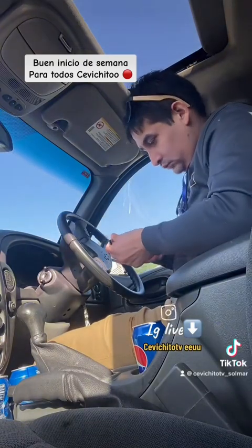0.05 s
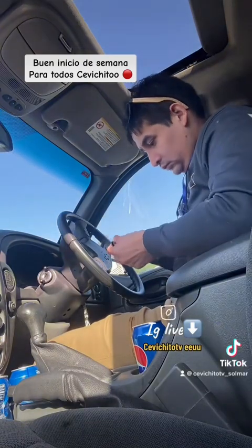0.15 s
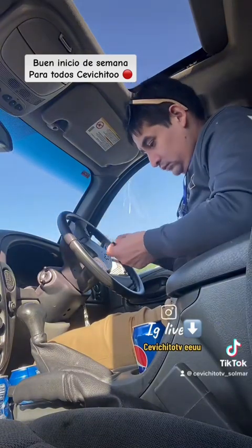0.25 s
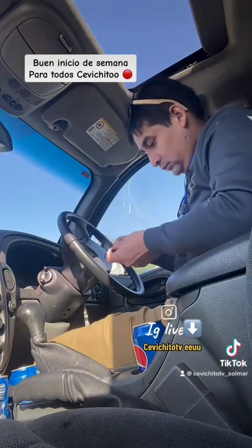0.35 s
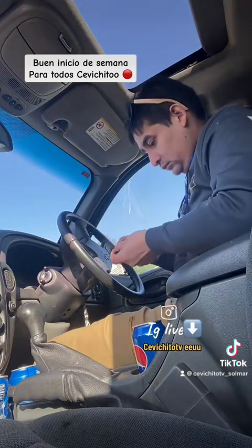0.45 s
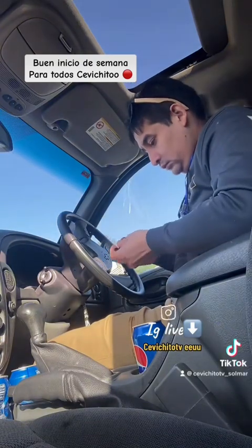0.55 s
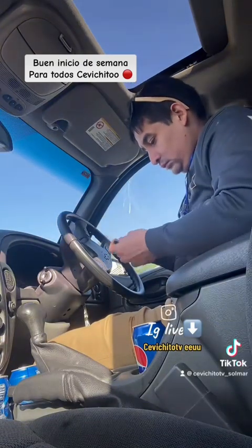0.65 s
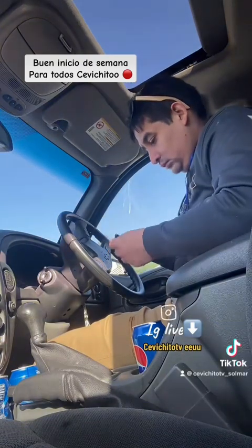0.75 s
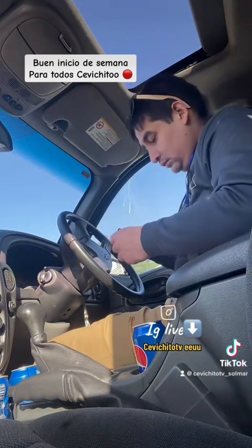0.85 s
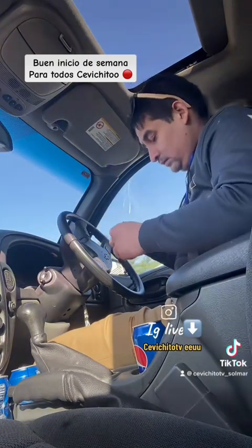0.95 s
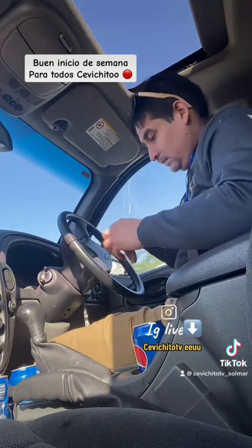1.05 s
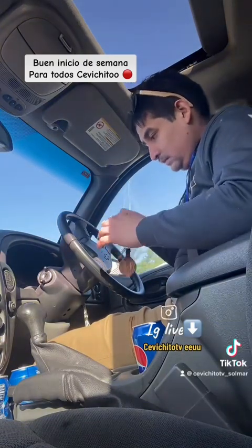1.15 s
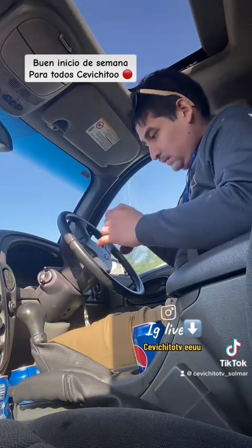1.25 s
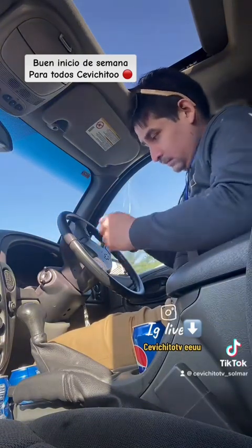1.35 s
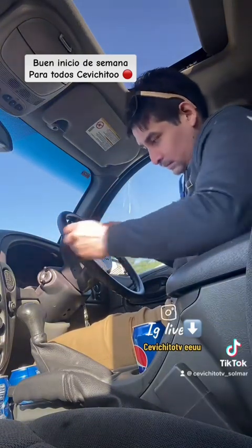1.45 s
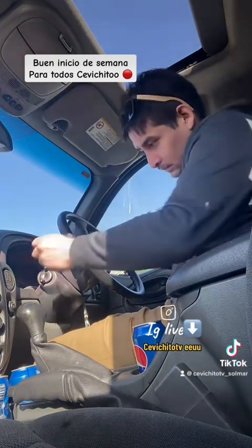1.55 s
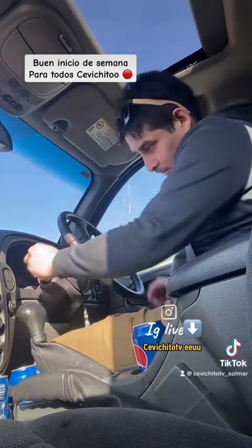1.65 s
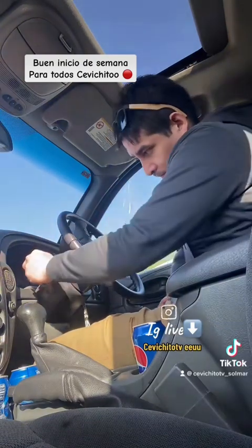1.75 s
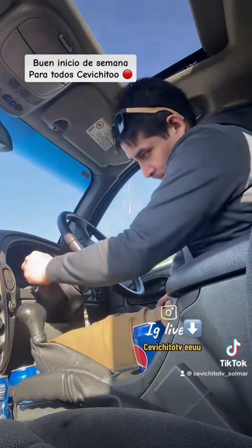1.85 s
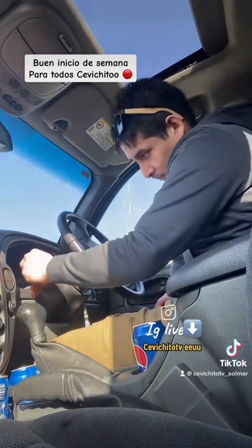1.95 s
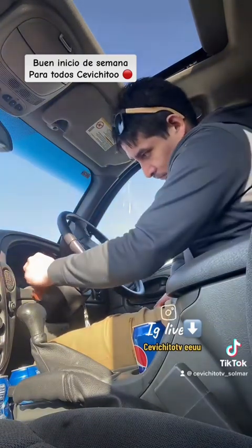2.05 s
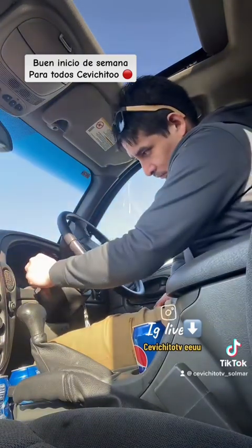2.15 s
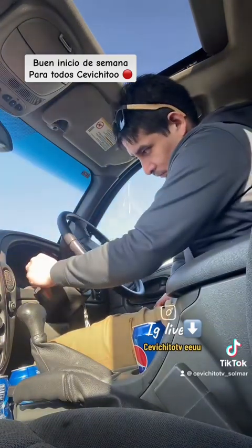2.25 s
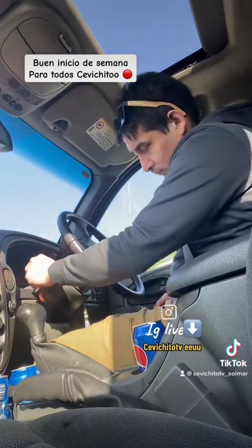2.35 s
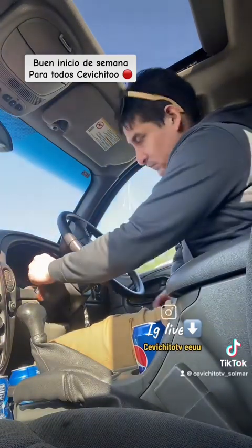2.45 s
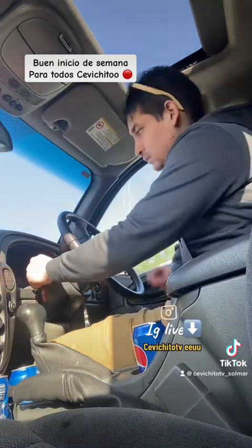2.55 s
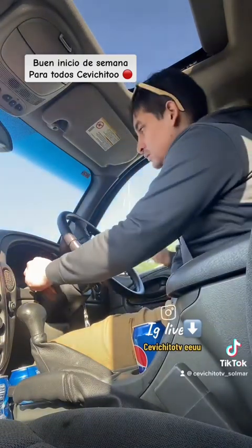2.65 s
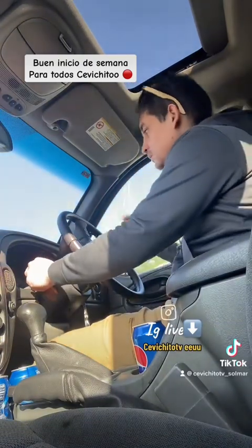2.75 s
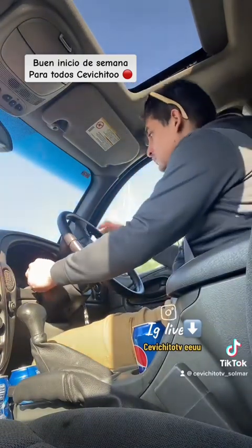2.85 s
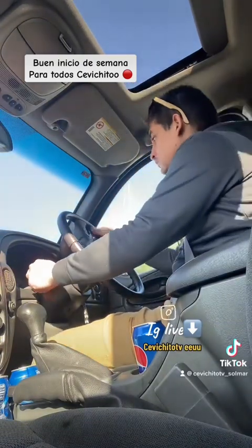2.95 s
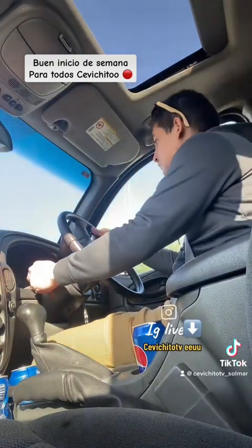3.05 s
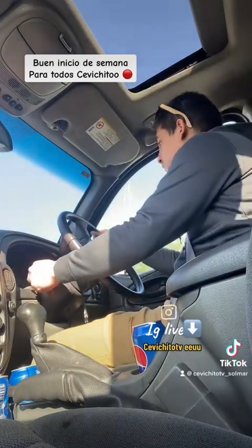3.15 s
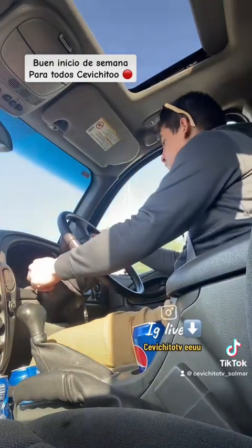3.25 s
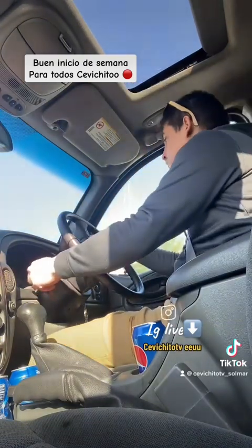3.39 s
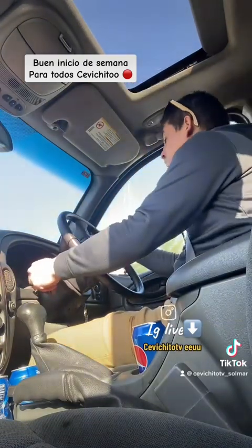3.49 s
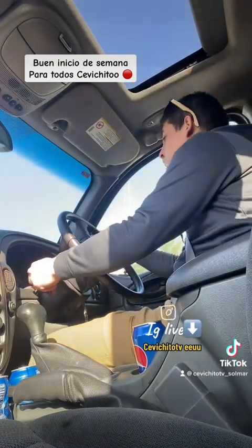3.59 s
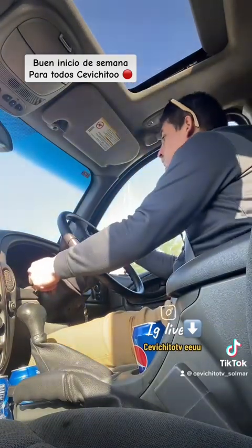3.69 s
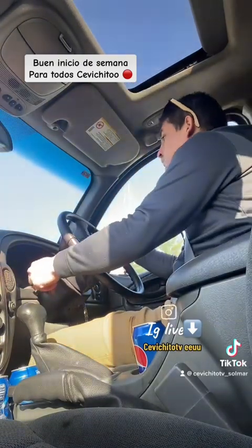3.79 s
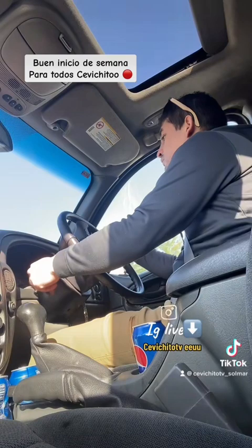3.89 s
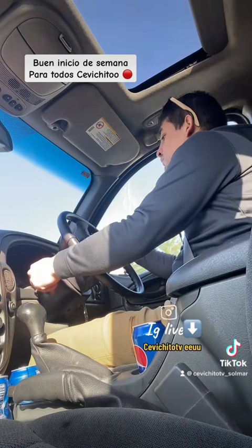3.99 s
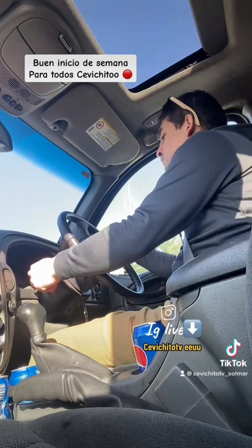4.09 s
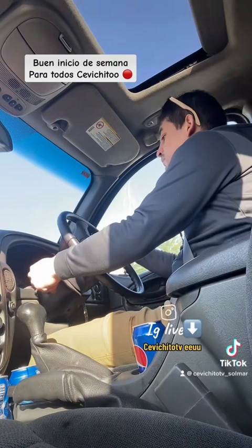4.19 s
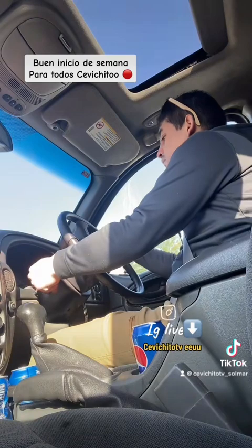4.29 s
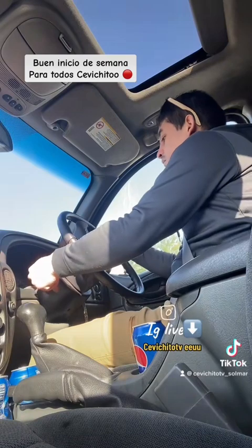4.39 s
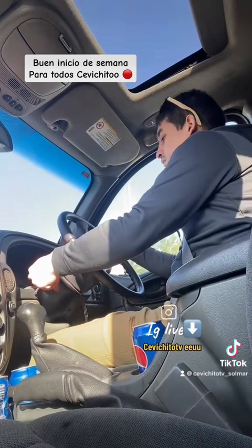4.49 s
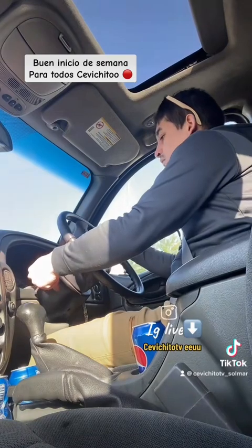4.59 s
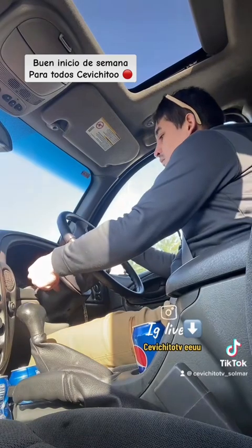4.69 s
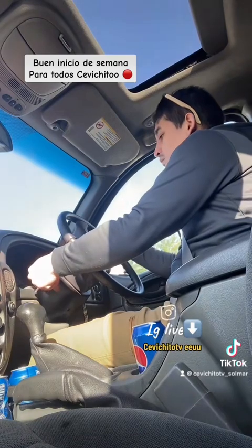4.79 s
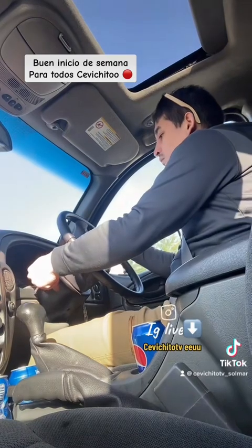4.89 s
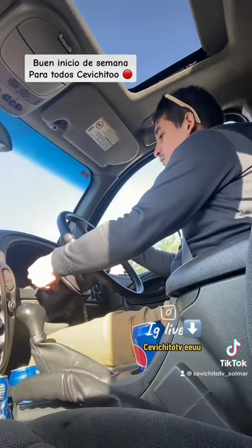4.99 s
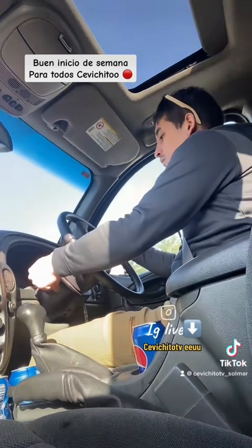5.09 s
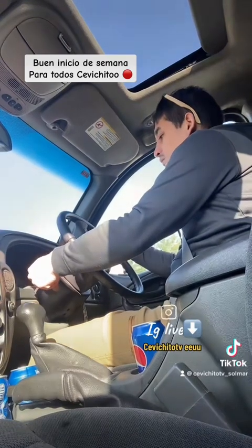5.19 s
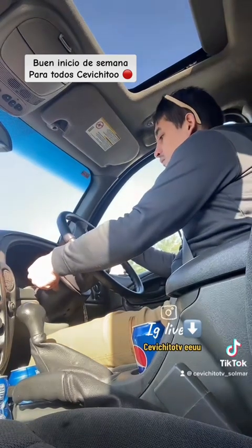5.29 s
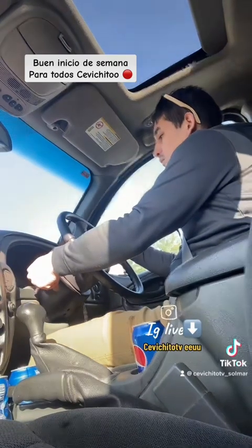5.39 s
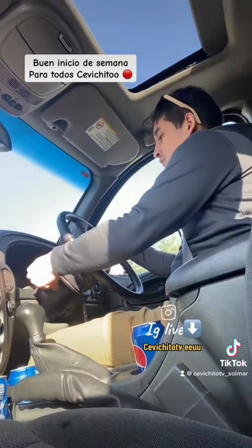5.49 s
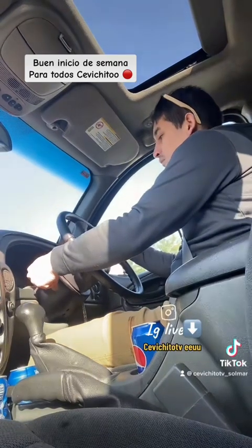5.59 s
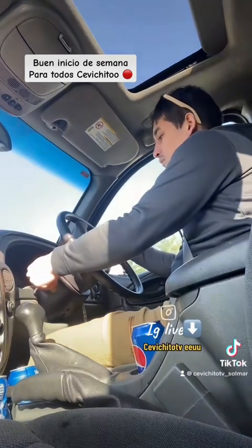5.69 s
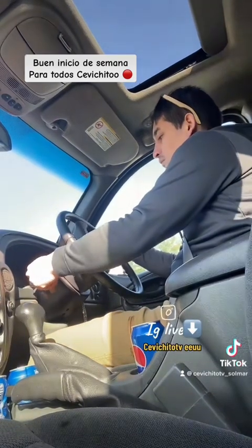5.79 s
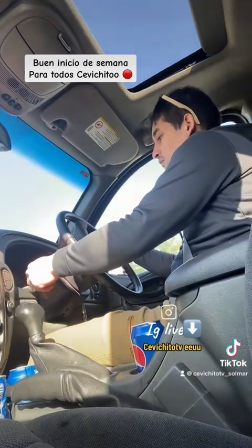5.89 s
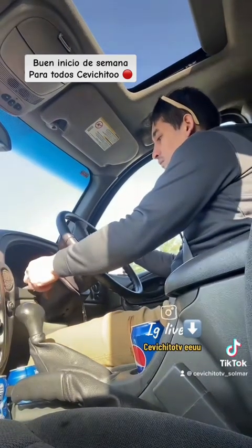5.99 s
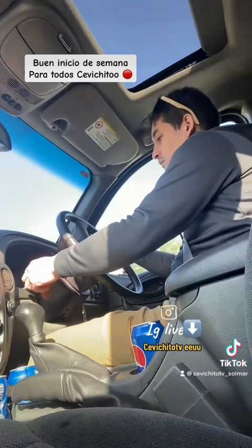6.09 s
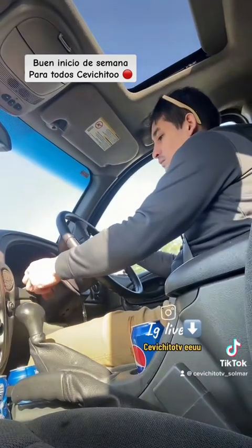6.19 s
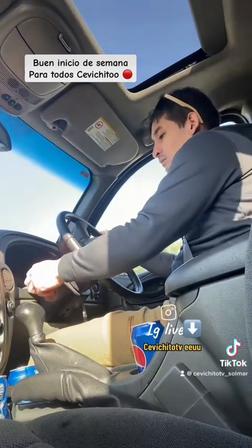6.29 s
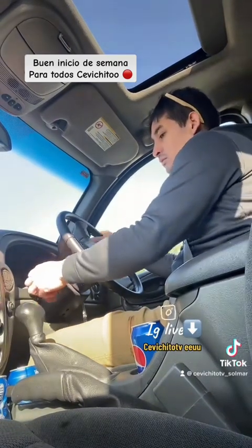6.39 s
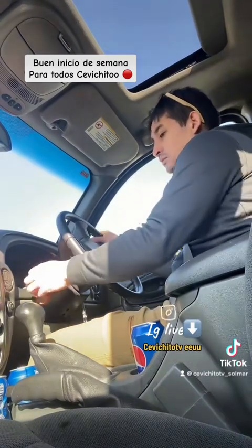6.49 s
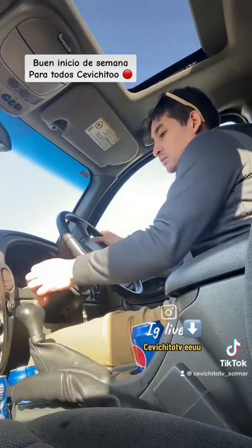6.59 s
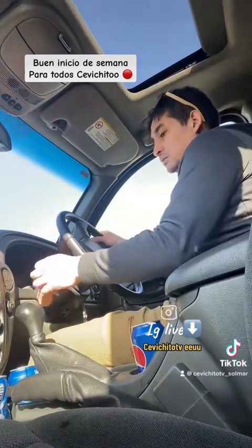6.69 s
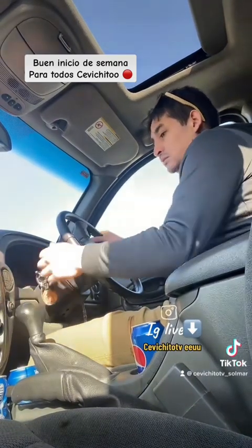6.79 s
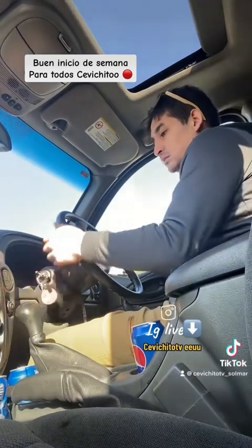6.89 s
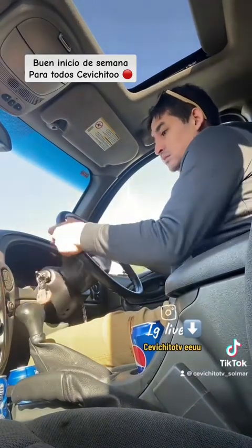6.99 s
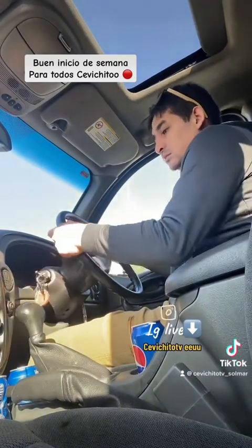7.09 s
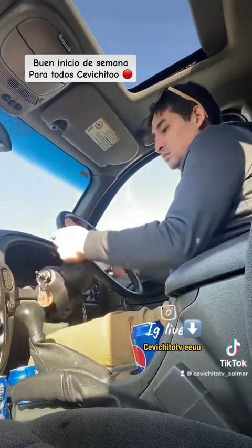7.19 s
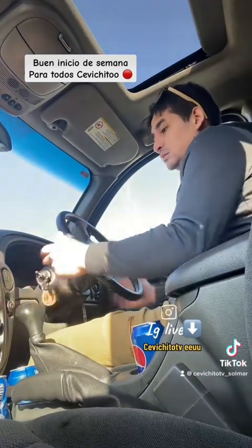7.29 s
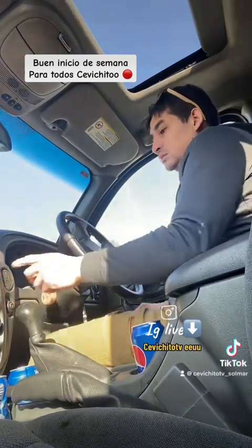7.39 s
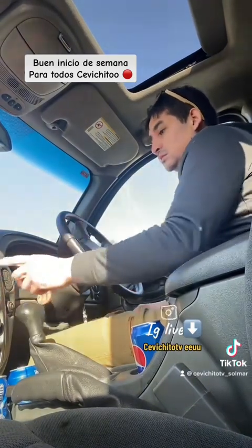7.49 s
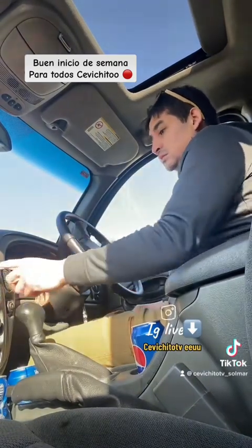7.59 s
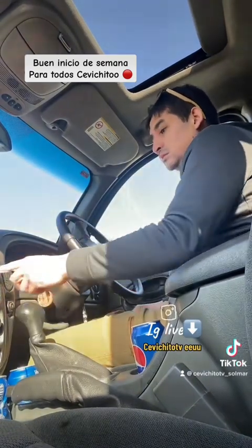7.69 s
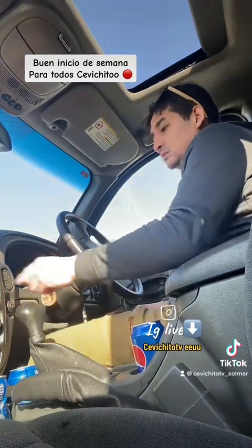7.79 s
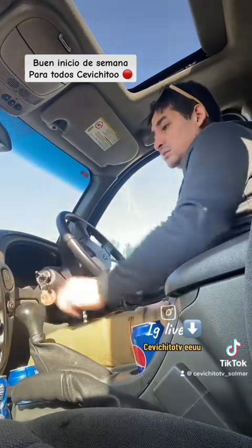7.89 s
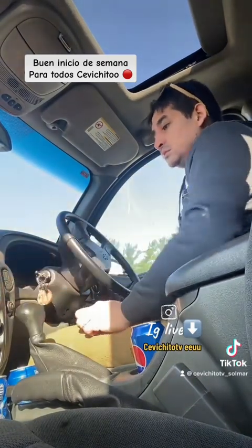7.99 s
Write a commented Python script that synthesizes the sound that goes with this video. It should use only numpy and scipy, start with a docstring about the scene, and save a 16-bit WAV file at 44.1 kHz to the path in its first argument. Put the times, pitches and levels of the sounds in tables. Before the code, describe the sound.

Close inside a parked car, small keys chink lightly over faint low street rumble while cloth rubs. The key scrapes and clicks into the lock, with two heavy, dull knocks around three seconds. The starter churns for about a second, the engine catches with a boom, then idles in a deep, slightly uneven hum. A few crisp dashboard knob clicks come near the end. A phone near the gear lever picks it up.

```python
"""Starting a parked car

Inside the cabin, with a phone for a microphone near the gear lever: keys chink in the hands, a sleeve
rustles, the key is pushed into the lock and turned click by click. The starter heaves the engine over its
compressions, it fires, and the fast idle booms in the cabin while a dashboard knob is clicked.
Knocks and metal are noise bursts and decaying modes; rumble, cloth and gears are shaped noise; the idle
is a tone at the firing rate with overtones."""
import sys
import numpy as np
from scipy import signal
from scipy.fft import rfft, irfft, next_fast_len
from scipy.io import wavfile
from scipy.ndimage import uniform_filter1d, map_coordinates

SR = 44100
rng = np.random.default_rng(int(sys.argv[2]) if len(sys.argv) > 2 else 0)


def log_audio(samples):
    """Write samples as a 16-bit WAV file to the path given in sys.argv[1]."""
    # one column per channel
    frames = np.atleast_2d(samples).T
    # limit to full scale, then quantise
    limited = np.clip(frames, -1, 1)
    pcm = np.round(limited * 32767).astype(np.int16)
    wavfile.write(sys.argv[1], SR, pcm)


N = 355005


def amp(db):
    """Linear gain of a level in dB."""
    return 10 ** (np.asarray(db) / 20)


def unit(x):
    """x scaled to an rms of 1."""
    return x / np.sqrt(np.mean(x ** 2) + 1e-20)


def seconds(length_s):
    """Sample times of a short sound (s)."""
    return np.arange(int(length_s * SR)) / SR


def progress(length_s):
    """Progress through a stroke, 0 to 1, one value per sample."""
    return np.arange(round(length_s * SR)) / (length_s * SR)


def curves(rows):
    """One value per sample for each column after the time; -120 outside the rows."""
    s, *cols = np.transpose(rows)
    return [np.interp(np.arange(N) / SR, s, c, left=-120, right=-120) for c in cols]


def wobble(rate):
    """A smooth random curve, rate knots a second."""
    knots = rng.standard_normal(int(N * rate / SR) + 4)
    return map_coordinates(knots, [np.arange(N) * rate / SR])


def filtered(x, response):
    """x passed through a complex response of frequency."""
    m = next_fast_len(len(x) + 8192)
    return irfft(rfft(x, m) * response(np.fft.rfftfreq(m, 1 / SR)), m)[:len(x)]


def shape(points):
    """Gain interpolated between (Hz, dB) points on a log frequency axis."""
    f, db = np.transpose(points)
    return lambda hz: amp(np.interp(np.log(hz + 1), np.log(f + 1), db))


def modes(table):
    """Causal response of (Hz, width Hz, dB) resonances, summed with alternating sign."""
    def response(f):
        total = 0
        for k, (c, w, db) in enumerate(table):
            total = total + (-1) ** k * amp(db) * 1j * f * w / (c * c - f * f + 1j * f * w)
        return total
    return response


def rush(response, patchy_db):
    """Coloured noise of rms 1, its time-frequency patches randomly louder or softer."""
    z = signal.stft(rng.standard_normal(N + 512), nperseg=512)[2]
    field = uniform_filter1d(rng.standard_normal(z.shape), size=6, axis=0)
    field = uniform_filter1d(field, size=8, axis=1)
    patchy = signal.istft(z * amp(patchy_db * unit(field)), nperseg=512)[1][:N]
    return unit(filtered(patchy, response))


def add(out, s, sound):
    """Mix a sound in at s seconds."""
    part = out[round(s * SR):][:len(sound)]
    part += sound[:len(part)]


# colour of the street rumble: pitch_hz, level_db (per Hz, relative)
STREET_COLOUR = [(12, -65), (20, -23.5), (36, -17), (59, 0.5), (129, -8), (166, -10), (306, -21.5),
                 (373, -23), (1080, -31.5), (1500, -54.5), (1950, -67.5), (3300, -120)]
RUMBLE_DB = -47
SHAKEN_S, SHAKEN_SPAN_S, SHAKEN_DB = 3.097, 0.61, 4  # the driver leans on the wheel: centre, spread, swell


def street_rumble():
    """Street noise through the body is low noise that drifts, swelling as the driver leans on the wheel."""
    shaken_db = SHAKEN_DB * np.exp(-((np.arange(N) / SR - SHAKEN_S) / SHAKEN_SPAN_S) ** 2)
    return amp(RUMBLE_DB + shaken_db + 3.3 * wobble(4.094)) * rush(shape(STREET_COLOUR), patchy_db=1.4)


def microphone_hiss():
    """The microphone's own noise is a faint steady hiss."""
    return amp(-84) * rush(shape([(1500, -16.5), (3000, 1.0), (15500, -10.5)]), patchy_db=1.0)


# a faint hollow hiss, as of air in a short pipe: time_s, level_db (before the trim)
HOLLOW_LEVEL = [(0, -58), (.06, -57.5), (.25, -54.5), (.44, -56.5), (.48, -63.5), (.58, -64), (.64, -79)]
# its resonances, each passed twice: pitch_hz, width_hz, level_db (per pass)
PIPE_MODES = [(1386, 120, -10), (1956.5, 110, -8), (2524, 130, -9), (3044, 200, -21)]
HOLLOW_TRIM_DB = -2.5
SING_DB, SING_BLUR = -1, .06  # singing tones over the hiss; their phase walk per sample (rad)


def hollow_hiss():
    """Noise in pipe-like resonances, with blurred tones singing at the same pitches."""
    waver = 1 + .01 * wobble(12)
    sing = np.zeros(N)
    for hz, _, db in PIPE_MODES:
        phase = np.cumsum(2 * np.pi * hz * waver / SR + SING_BLUR * rng.standard_normal(N))
        sing += amp(2 * db) * np.sin(phase)
    pipe = modes(PIPE_MODES)
    hollow = rush(lambda f: pipe(f) ** 2, patchy_db=0.0) + amp(SING_DB) * unit(sing)
    return amp(curves(HOLLOW_LEVEL)[0] + HOLLOW_TRIM_DB) * hollow


# thin tones that come and go over the idle: start_s, length_s, pitch_hz, level_db (peak)
THIN_TONES = [(5.703, 0.63, 2344, -61.5), (6.777, 0.316, 2240, -59)]


def thin_tones():
    """Faint tones swell and fade, their phase slightly unsteady."""
    out = np.zeros(N)
    for s, length, hz, db in THIN_TONES:
        u = progress(length)
        tone = np.sin(2 * np.pi * hz * length * u + 0.72 * wobble(40)[:len(u)])
        add(out, s, amp(db) * np.sin(np.pi * u) * tone)
    return out


# level of the sleeve: time_s, level_db (before the floor)
SLEEVE_LEVEL = [(0, -57), (.3, -56), (.66, -64), (.84, -59.5), (1.04, -58.5), (1.24, -53), (1.6, -48),
                (1.73, -65.5), (2.05, -61), (2.25, -54), (2.88, -51), (3.1, -59.5), (3.4, -60),
                (3.67, -55.5), (4.2, -56)]
# colour of the cloth: pitch_hz, level_db (per Hz, relative)
CLOTH_COLOUR = [(240, 2), (400, -2), (673, -10), (914, -1.5), (1120, -6.5), (2840, -11), (6090, -21.5),
                (6580, -25.5), (15500, -45)]
RUSTLE_FLOOR_DB = -61.5  # cloth at rest


def sleeve():
    """The driver's sleeve rubs: broad noise whose level follows the movement."""
    rustle_db = np.maximum(curves(SLEEVE_LEVEL)[0], RUSTLE_FLOOR_DB)
    return amp(rustle_db + 1.1 * wobble(14)) * rush(shape(CLOTH_COLOUR), patchy_db=.8)


# short bands of grainy noise: rubs of key, hands and seat, and brief pings beside the clicks:
# start_s, length_s, level_db, pitch_hz (band centre), width_hz (of each of two passes)
GRAINY_BANDS = [(1.494, 0.159, -47.5, 497, 804), (1.5, 0.059, -51, 1500, 2000),
                (1.543, 0.0557, -48.5, 2920, 2940), (1.599, 0.0306, -57, 2500, 2600),
                (1.925, 0.0181, -42.5, 2880, 500), (1.937, 0.063, -52.5, 785, 600),
                (2.074, 0.0307, -48, 1130, 400), (2.255, 0.065, -46.5, 5256, 250),
                (2.168, 0.179, -56.5, 5890, 1330), (2.169, 0.113, -65.5, 9500, 9000),
                (2.219, 0.12, -51.5, 5265, 200), (2.248, 0.086, -41.5, 3580, 4220),
                (2.989, 0.0975, -49.5, 482, 300), (2.99, 0.0856, -52, 1970, 495),
                (2.994, 0.0786, -53, 2705, 507), (3.028, 0.031, -54, 3800, 2500),
                (2.985, 0.101, -61.5, 5630, 1500), (2.995, 0.0724, -63.5, 7910, 1000),
                (5.189, 0.12, -59, 6900, 7950), (5.553, 0.0654, -54, 5120, 4950),
                (6.353, 0.121, -56, 2370, 2830), (6.948, 0.219, -65, 6700, 5900),
                (7.165, 0.0699, -53, 2918, 2472), (7.029, 0.035, -58.5, 6160, 800),
                (7.763, 0.0462, -47, 3360, 1974), (7.795, 0.094, -48.5, 1650, 1200)]


def grainy_bands():
    """Rubs and brief pings: grainy noise in one resonance, swelling and fading over its length."""
    out = np.zeros(N)
    for s, length, db, hz, width_hz in GRAINY_BANDS:
        u = progress(length)
        grit = rng.standard_normal(len(u)) * amp(3.0 * wobble(136)[:len(u)])
        band = modes([(hz, width_hz, 0)])
        grain = unit(filtered(grit, lambda f: band(f) ** 2))
        add(out, s, amp(db) * np.sin(np.pi * u ** 0.803) ** 0.76 * grain)
    return out


# dull bumps of the seat and wheel: start_s, level_db (before the soft attack), pitch_hz
SOFT_BUMPS = [(2.142, -44.5, 165.8), (2.29, -29, 71.6), (2.31, -38, 188.3), (2.4, -36.5, 145),
              (2.78, -26.5, 114.2), (2.81, -19.5, 58.9), (2.822, -29.5, 207.3), (2.868, -21, 46.3),
              (3.17, -19.5, 67.6), (3.297, -24.5, 62), (3.361, -41.5, 168), (3.82, -41.5, 94.4),
              (3.96, -30, 91.5)]
BUMP_T60_S = 0.2104


def bumps():
    """Soft pushes ring the lowest cabin resonances as decaying tones."""
    out, t = np.zeros(N), seconds(.5)
    for s, db, hz in SOFT_BUMPS:
        attack = 1 - np.exp(-t / 0.0194)
        add(out, s, amp(db - 60 * t / BUMP_T60_S) * attack * np.sin(2 * np.pi * hz * t))
    return out


# detents of the dashboard knob: time_s (burst starts 1 ms earlier), level_db (peak), tilt_db (per octave)
KNOB_CLICKS = [(7.333, -40.5, -13), (7.384, -31, 1.5), (7.395, -50, 6), (7.452, -40.5, 2.5),
               (7.462, -30.5, -1), (7.546, -22, -6), (7.559, -37.5, -2), (7.853, -50, -11)]
# resonances of the knob: pitch_hz, width_hz, level_db (relative)
KNOB_MODES = [(1324.4, 160, -2), (1877, 120, 3), (2246, 140, 8.5), (2677, 140, 6), (3446, 83, -1),
              (4207, 140, 0.5), (4693, 150, -15), (5870, 360, -23), (8800, 5400, -46)]
DETENT_T60_S = 0.036
SNAP = 2.5  # height of the single-sample tick, added to the unit-strength rattle
CRACK_DB, CRACK_HZ = -8, 4750  # broad crack beside the knob's resonances


def knob():
    """Each detent is a short rattle through the knob's resonances, some brighter, some duller."""
    out, t = np.zeros(N), seconds(1 / 8)
    body, crack = modes(KNOB_MODES), modes([(CRACK_HZ, 4000, CRACK_DB)])
    for s, db, tilt_db in KNOB_CLICKS:
        rattle = (1 - np.exp(-t / 0.0033)) * amp(-60 * t / DETENT_T60_S) * rng.standard_normal(len(t))
        rattle = rattle + SNAP * (t == t[40])  # a single-sample tick sharpens the click

        def response(f):
            tilt = amp(tilt_db * np.log2((f + 500) / 2500))
            return (body(f) + crack(f) / (1 + (f / 8000) ** 4)) * tilt

        click = filtered(rattle, response)
        add(out, s - .001, amp(db) * click / np.abs(click).max())
    return out


# small keys touch each other: start_s, level_db (relative), t60_s (of the ring),
# scratch_db (relative, before the ring's own trim)
KEY_TOUCHES = [(0.013, -59, .1, 5.5), (0.088, -57.5, .07, 0.5), (.176, -62, .08, 4.5),
               (0.295, -56.5, 0.24, 0), (0.327, -58, .08, 3.5), (.368, -52.5, 0.071, -1),
               (.404, -39, 0.085, -0.5), (0.489, -56.5, 0.11, 1.5), (.552, -66, .1, 4.5),
               (0.811, -68.5, .1, 14), (0.858, -57.5, 0.28, -2), (0.898, -45.5, 0.77, -2),
               (0.956, -56.5, 0.27, 10), (1.058, -51.5, 0.086, 3.5), (6.264, -50, 0.212, 2)]
# modes of the small keys: pitch_hz, level_db (mean, relative)
SMALL_KEY_MODES = [(6210, -11), (6950, -2.5), (7350, -2), (7800, -9), (9100, -11.5), (10700, -3.5),
                   (11200, -6), (12600, -12.5)]
# modes of the largest key: pitch_hz, level_db (relative), t60_s
LARGE_KEY_MODES = [(2550, 0, 0.25), (5160, -11, 1.6)]
# the largest key is struck itself: start_s, level_db (relative), lift_db (of its lower mode)
LARGE_KEY_PINGS = [(.872, -66, 4), (.9, -64, 2), (1.035, -68, 9)]
LARGE_SHARE_DB = -15.5  # the largest key rings along with every touch, before the ring's trim


def large_key(s, low_db):
    """Decaying modes of the largest key, phased by the clock so strikes add in step."""
    t, ring = seconds(.5), 0
    for (hz, level, t60), lift in zip(LARGE_KEY_MODES, (low_db, 0)):
        ring = ring + amp(level + lift - 60 * t / t60) * np.sin(2 * np.pi * hz * (t + round(s * SR) / SR))
    return ring


def keys():
    """Each touch in the hands is a short scratch and rings the blades at new strengths, the tones blurred."""
    out, t = np.zeros(N), seconds(.5)
    scratch = lambda f: (f / 3500) ** 2 / (1 + (f / 3500) ** 2) / (1 + (f / 11000) ** 4)
    attack = 1 - np.exp(-t / 0.0023)
    for s, db, t60, scratch_db in KEY_TOUCHES:
        ring = amp(LARGE_SHARE_DB) * large_key(s, 0)
        for hz, level in SMALL_KEY_MODES:
            drift = np.cumsum(rng.normal(0, .22, len(t)))  # phase walk (rad)
            ring = ring + amp(level + rng.normal(0, 3)) * np.sin(2 * np.pi * hz * t + drift)
        touch = amp(scratch_db - 60 * t / 0.108) * filtered(rng.standard_normal(len(t)), scratch)
        add(out, s, amp(db) * attack * (0.285 * ring * amp(-60 * t / t60) + touch))
    for s, db, low_db in LARGE_KEY_PINGS:
        flutter_db = 4.5 * wobble(30)[:len(t)]  # the ring's level flutters at random
        add(out, s, amp(db + flutter_db) * attack * large_key(s, low_db))
    return out


# clicks of lock and key on plastic: time_s (of the hardest contact), level_db (of the snap),
# knock_db, body_db (both over the snap), t60_s, rise_s
LOCK_CLICKS = [(0.717, -78, 28, 2, 0.071, 0.002), (0.797, -51.5, -9.5, -8.5, 0.048, 0.00334),
               (.842, -50.5, -7.5, -10, 0.0454, 0.0037), (1.866, -58.5, -1.5, -5.5, 0.053, .002),
               (1.929, -44.5, 3, 3.5, 0.0903, 0.0022), (2.0438, -50, 6, 4, 0.0697, 0.00785),
               (2.0761, -29, -13.5, -9, 0.055, 0.0014), (2.143, -64, 18.5, 11.5, 0.165, 0.007),
               (2.254, -39.5, 10, 4, 0.131, 0.0105), (2.299, -22.5, 2.5, -10, 0.063, 0.012),
               (2.3069, -26, 8.5, 4.5, 0.0836, 0.00775), (2.376, -51.5, 13.5, 8, 0.173, 0.0073),
               (2.4, -30, 6, 6.5, 0.0698, 0.00546), (2.7545, -48.5, 4, 0, 0.29, 0.0237),
               (2.814, -9.5, -2.5, 1.5, 0.06125, 0.011), (2.873, -42.5, -13, 3, 0.039, 0.0047),
               (2.902, -67, 29.5, -4, 0.054, 0.0016), (3.295, -11.5, 1.5, -2, 0.0645, 0.00864),
               (3.364, -49, 23, 13.5, 0.141, 0.0169), (3.4155, -35, 9.5, 9.5, 0.0545, 0.0097),
               (3.65, -49.5, 5.5, 1.5, 0.0495, 0.0066), (3.7506, -39, 9, 4.5, 0.0686, 0.0164),
               (3.958, -49.5, 11.5, 3, 0.082, 0.0089), (4.172, -67.5, 20.5, 18.5, 0.118, 0.008),
               (4.189, -48, 15, 9, 0.298, 0.0132), (6.3889, -46, 17, 14, 0.086, 0.0156),
               (6.46, -50, 10.5, 6, 0.086, 0.0077)]
# lock housing: pitch_hz, width_hz, level_db (relative)
LOCK_MODES = [(3327, 150, 5), (3550, 266, 4.5), (4340, 690, -0.5), (5284, 171, 4), (6100, 220, -4.5)]
# hollow steering column, each passed twice: pitch_hz, width_hz, level_db (per pass)
COLUMN_MODES = [(303, 293, -9.5), (566.6, 259, -9.5), (746, 111, -3.5), (1061, 162, -10)]
# dashboard panel: pitch_hz, width_hz, level_db (relative)
PANEL_MODES = [(1224, 311, -3), (1616, 340, -1), (2006, 160, 0), (2310, 294, -1), (2957, 280, -3)]
# bright sizzle on top: pitch_hz, level_db (per Hz, relative)
SIZZLE_COLOUR = [(5000, -38.5), (6500, 13), (9000, 2.5), (15500, -36.5)]
# trim around the column: pitch_hz, level_db (per Hz, relative)
THUD_COLOUR = [(80, -32), (200, 0), (500, 0), (950, -2), (1300, -13.5), (3000, -53)]
SIZZLE_DB = -15  # relative to the snap
DULL_DB = 17.5  # knocks this far over their snap thud as much as they ring
TAIL_DB, TAIL_T60_S = -25, 0.356  # trim and panel mutter on after a knock


def clicks():
    """Each click is a rattling burst that snaps in the lock, knocks column and panel and sizzles on top."""
    t = seconds(.25)
    drive = np.zeros((5, N))
    snap, _, panel, _, thud = drive  # the other rows ring the column and sizzle
    for s, db, knock_db, body_db, t60, rise_s in LOCK_CLICKS:
        start_s = s - rise_s
        rise = 1 - np.exp(-(t / rise_s) ** 2)
        swell = rise * amp(db - 60 * t / t60)
        # the hardest contact, a sharp tick
        add(snap, start_s, 0.42 * amp(db - 60 * np.abs(t - rise_s) / 0.0028))
        # power share of the knock that thuds without ringing the column
        dull = 1 / (1 + amp(DULL_DB - knock_db) ** 2)
        ringing, thudding = amp(knock_db) * np.sqrt(1 - dull), amp(knock_db) * np.sqrt(dull)
        for row, gain in zip(drive, (1, ringing, amp(body_db), amp(SIZZLE_DB), thudding)):
            add(row, start_s, gain * swell)
        for row, gain_db in ((thud, knock_db), (panel, body_db - 18.5)):
            add(row, start_s, rise * amp(db + gain_db + TAIL_DB - 60 * t / TAIL_T60_S))
    # loose parts chatter: several tiny contacts
    contacts = amp(3 * wobble(500)) * rng.standard_normal((5, N))
    column = modes(COLUMN_MODES)
    parts = (modes(LOCK_MODES), lambda f: column(f) ** 2, modes(PANEL_MODES),
             shape(SIZZLE_COLOUR), shape(THUD_COLOUR))
    out = np.zeros(N)
    for row, noise, part in zip(drive, contacts, parts):
        out += filtered(row * noise, part) / np.std(filtered(noise, part))
    return out


# the pinion engages, then compression strokes under the starter: start_s, boom_db, boom_hz, length_s,
# gears_db, whine_db (before the tooth tone joins), tooth_hz, sag (0-1, its fall over the stroke)
COMPRESSIONS = [(4.214, -14, 61.37, 0.0833, -22, -44, 836.6, 0),
                (4.287, -19, 56.14, 0.086, -31, -50.5, 970, 0.08),
                (4.369, -21.5, 51, 0.0746, -40, -57.5, 943, 0.05),
                (4.423, -32, 51.7, 0.1407, -32, -45.5, 1074, 0.31),
                (4.64, -16, 59.8, 0.1132, -25.5, -47.5, 1073, 0.08),
                (4.764, -15, 58.67, 0.139, -28.5, -50.5, 1032, 0),
                (4.916, -13.5, 58.36, 0.137, -28, -53, 1138, 0.01),
                (5.061, -14, 59.85, 0.103, -32.5, -49.5, 1170, 0),
                (5.196, -15, 63.9, 0.056, -22.5, -50, 1102, 0.03)]
# first firings jolt body and gears: start_s, boom_db, boom_hz, length_s, gears_db
FIRST_FIRINGS = [(5.234, -16, 105.7, 0.0443, -21.5), (5.25, -18, 171.4, .024, -31),
                 (5.263, -19.5, 97.4, 0.046, -16.5), (5.288, -7.5, 54.1, 0.044, -23.5),
                 (5.35, -16, 54.8, 0.053, -43)]
# the pinion teeth bite as each compression loads them: start_s, level_db (before the attack), t60_s
TOOTH_BITES = [(4.634, -41.5, 0.244), (4.788, -40, 0.337), (4.928, -40.5, .3), (5.07, -44, 0.37)]
# starter gears: pitch_hz, level_db (per Hz, relative)
GEAR_COLOUR = [(24, -53), (60, -10.5), (110, -11), (190, -16.5), (325, -21.5), (431, -34), (600, -34.5),
               (1070, -42.5), (1650, -48), (2890, -53.5), (5170, -59.5), (7000, -70), (9100, -104),
               (15400, -120)]
# rasp of the biting teeth: pitch_hz, level_db (per Hz, relative)
RASP_COLOUR = [(200, -32), (450, 2), (1000, -4), (1400, -6), (1800, -13), (3300, -13), (6500, -29),
               (9000, -46)]
# motor brushes: pitch_hz, level_db (per Hz, relative)
BRUSH_COLOUR = [(710, -30), (1200, -21.5), (1520, 8.5), (1640, -8), (2280, 4.5), (3810, 0.5), (6240, -11),
                (15500, -39.5)]
HELD_S, FREE_S, LET_GO_S = 4.19, 5.2, 5.6  # key held, motor spins free, key let go
LOADED_DB, FREE_DB = -57.5, -49.5  # starter motor whirr
RUN_DOWN_T60_S = 0.6  # the freed motor coasts to rest
STRAIN_DB = -34.5  # brush noise relative to the gears
MESH_DB, WHINE_WIDTH_HZ = 2, 530  # tooth tone over the whine; width of the noisy whine around it
UPPER_HZ, UPPER_DB = 82.87, -8.5  # a second cabin resonance beats against the boom early in each stroke


def starter_boom():
    """Every compression or firing rocks the body, so the cabin booms in a low tone burst."""
    boom = np.zeros(N)
    for s, boom_db, hz, length, *_ in COMPRESSIONS + FIRST_FIRINGS:
        u = progress(length)
        waver = 0.5 * np.sin(2 * np.pi * (1.42 * u + rng.random()))
        tone = np.sin(2 * np.pi * hz * length * u + waver)
        upper = np.sin(2 * np.pi * UPPER_HZ * length * u)
        add(boom, s, amp(boom_db) * np.sin(np.pi * u ** 0.933) ** 0.54 * tone)
        add(boom, s, amp(boom_db + UPPER_DB) * np.sin(np.pi * u ** .5) ** 2 * upper)
    return filtered(boom, lambda f: 1 / (1 + (f / 400) ** 4))  # the body rocks too slowly to click


def tooth_whine():
    """Meshing teeth whine as a wavering tone in a band of noise, sagging in pitch as the stroke goes on."""
    whine = np.zeros(N)
    for s, _, _, length, _, whine_db, mesh_hz, sag in COMPRESSIONS:
        u = progress(length)
        teeth = 2 * np.pi * mesh_hz * length * (u - sag * u ** 2 / 2)
        blur = filtered(rng.standard_normal(len(u)), lambda f: 1 / (1 + (2 * f / WHINE_WIDTH_HZ) ** 2))
        tone = amp(MESH_DB) * np.sin(np.pi * u) * np.sin(teeth + 0.95 * wobble(67)[:len(u)])
        add(whine, s, amp(whine_db) * np.sin(np.pi * u ** 0.88) * (tone + unit(blur * np.cos(teeth))))
    return whine


def starter_gears():
    """Gears grind hardest before the middle of each stroke, teeth rasp as they bite and brushes whirr."""
    grind = np.zeros(N)
    for s, _, _, length, grind_db, *_ in COMPRESSIONS + FIRST_FIRINGS:
        u = progress(length)
        add(grind, s - .015, amp(grind_db) * np.sin(np.pi * u ** 0.762) ** 1.103)
    bite, after = np.zeros(N), seconds(.25)
    for s, db, t60 in TOOTH_BITES:
        add(bite, s, amp(db - 60 * after / t60) * (1 - np.exp(-after / .004)))
    t = np.arange(N) / SR
    spin = amp(np.where(t < FREE_S, LOADED_DB, FREE_DB)) * (t > HELD_S)
    # 8 dB down at once when the key is let go, then a slow decay
    spin *= np.where(t < LET_GO_S, 1, amp(-8 - 60 * (t - LET_GO_S) / RUN_DOWN_T60_S))
    whirr = uniform_filter1d(spin, size=1300) + amp(STRAIN_DB) * grind
    gears = grind * rush(shape(GEAR_COLOUR), patchy_db=2)
    rasp = bite * rush(shape(RASP_COLOUR), patchy_db=1.5)
    return gears + rasp + whirr * rush(shape(BRUSH_COLOUR), patchy_db=2.5)


# engine noise through the firewall: time_s, roar_db, clatter_db (before its gate), hiss_db
FIREWALL_LEVELS = [(4.17, -36.5, -51.5, -75.5), (4.7, -38.5, -49, -70), (5.15, -27.5, -47.5, -65),
                   (5.3, -20, -40.5, -62.5), (5.42, -25.5, -41.5, -59), (5.59, -28.5, -43.5, -57.5),
                   (5.64, -29.5, -46, -62.5), (5.8, -30, -45.5, -63), (6.2, -32, -46.5, -67),
                   (6.65, -34.5, -45.5, -66.5), (7.3, -32.5, -45.5, -71.5), (8.05, -33, -45, -73.5)]
# colour of the roar: pitch_hz, level_db (per Hz, relative)
ROAR_COLOUR = [(12, -47), (20, -9.5), (43, -34.5), (70, 3.5), (120, -8), (172, -15), (236, -12),
               (541, -28.5), (818, -46.5), (900, -43.5), (1170, -60), (1980, -120)]
# colour of the clatter: pitch_hz, level_db (per Hz, relative)
CLATTER_COLOUR = [(240, -5), (400, -10.5), (432, -10), (643, -10.5), (957, -8.5), (1250, -15), (2250, -19),
                  (4000, -30), (6300, -39), (6800, -42), (15500, -65.5)]
# colour of the treble hiss: pitch_hz, level_db (per Hz, relative)
HISS_COLOUR = [(2000, -31), (3500, -1), (5200, 0), (6400, -5), (7200, -17), (10000, -34.5)]


def engine_noise(turn):
    """Roar, clatter and treble hiss are drifting noise; the clatter pulses with the firing phase."""
    roar_db, clatter_db, hiss_db = curves(FIREWALL_LEVELS)
    hiss = amp(hiss_db + .7 * wobble(16)) * rush(shape(HISS_COLOUR), patchy_db=1.5)
    roar = amp(roar_db + .8 * wobble(12)) * rush(shape(ROAR_COLOUR), patchy_db=1.2)
    gate = 1 + 0.092 * np.sin(turn)  # valve and injector noise swells once a firing
    clatter = amp(clatter_db + .7 * wobble(10)) * gate * rush(shape(CLATTER_COLOUR), patchy_db=1.1)
    return roar + clatter + hiss


# running engine: time_s, firing_hz, boom_db (rms before the lope), uneven (cylinders, 0-1),
# fifth_db (rms of the fifth multiple)
IDLE = [(5.36, 45.96, -26, 0.02, -61), (5.42, 46.65, -15, 0, -40.5), (5.64, 57.37, -15.5, 0.37, -51.5),
        (5.78, 59.33, -19.5, 0.51, -52.5), (5.92, 60.35, -27, 0.96, -63), (6.12, 60.93, -27.5, 1, -67),
        (6.28, 60.69, -20, 0, -69.5), (6.5, 61.71, -24.5, 0, -41), (6.7, 62.22, -39, 0.84, -45.5),
        (6.9, 62.57, -32, 0.02, -54.5), (7.15, 63.33, -23.5, 0.1, -51), (7.3, 64.17, -21.5, 0, -37.5),
        (7.44, 63.92, -17.5, 0.01, -40), (8.05, 64.45, -17.5, 0.08, -52)]
# overtones of the firing rate: multiple, level_db (relative)
FIRING_OVERTONES = [(.5, -26), (1.5, -22.5), (2, -20.5), (2.5, -29.5), (3, -23.5), (3.5, -23.5), (4, -26),
                    (6, -37.5), (7, -37), (7.5, -38), (9, -40)]
CYLINDERS = 6
WEAK_S = 5.924  # a moment when the weakest cylinder fires
OVERTONES_DB, OVERTONES_GROW_DB_PER_S = -18.5, 1.3  # when the engine catches, and as it settles


def engine():
    """The firing rate booms, sagging once a cycle while one cylinder lags; overtones and noise ride on it."""
    hz, boom_db, uneven, fifth_db = curves(IDLE)
    since = np.arange(N) / SR - IDLE[0][0]
    turn = 2 * np.pi * np.cumsum(np.maximum(hz, 40) * (1 + 0.00212 * wobble(12))) / SR  # firing phase
    cycle = (turn - turn[round(WEAK_S * SR)]) / CYLINDERS
    lope = 1 - np.clip(uneven, 0, 1) * np.cos(cycle)
    boom_level = uniform_filter1d(amp(boom_db + 0.96 * wobble(25)), size=441)
    boom = np.sqrt(2) * lope * boom_level * np.sin(turn)
    orders = np.zeros(N)
    for k, db in FIRING_OVERTONES:
        phase = rng.uniform(0, 2 * np.pi) + .2 * wobble(15)
        orders += amp(db + 1.8 * wobble(4)) * np.sin(k * turn + phase)
    over = np.clip(since / 0.082, 0, 1) * amp(OVERTONES_DB + OVERTONES_GROW_DB_PER_S * since)
    # the fifth multiple meets a panel resonance and comes and goes
    fifth = np.sqrt(2) * amp(fifth_db) * np.sin(5 * turn + .3 * wobble(15))
    return boom + fifth + over * orders + engine_noise(turn)


def scene():
    """The cabin from the street outside to the engine, as one channel."""
    background = street_rumble() + microphone_hiss() + hollow_hiss() + thin_tones()
    driver = sleeve() + grainy_bands() + bumps() + knob() + keys() + clicks()
    starter = starter_boom() + tooth_whine() + starter_gears()
    return (background + driver + starter + engine())[None]


TOP_HZ = 15800


def record(dry):
    """The phone's microphone keeps nothing above its band limit."""
    return filtered(dry[0], lambda hz: hz < TOP_HZ)[None]


dry = scene()
out = record(dry)
log_audio(out)
```